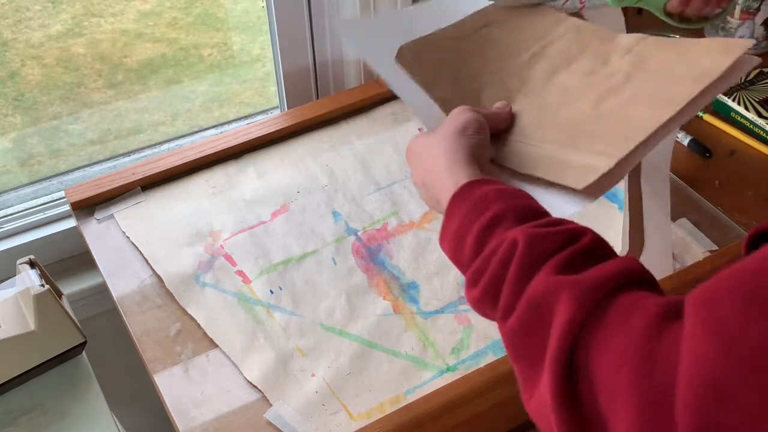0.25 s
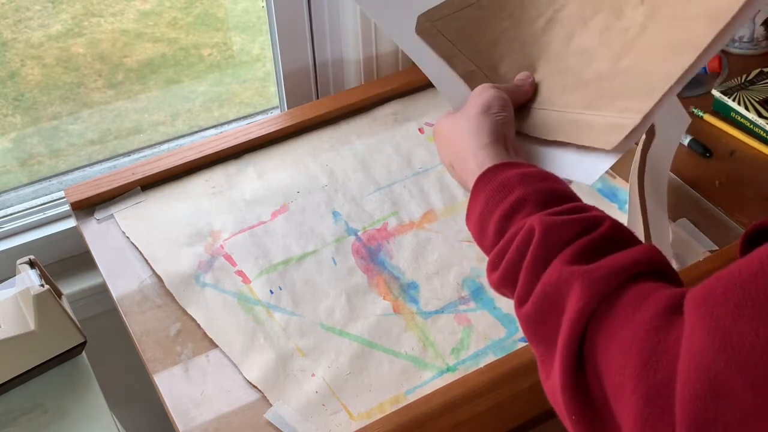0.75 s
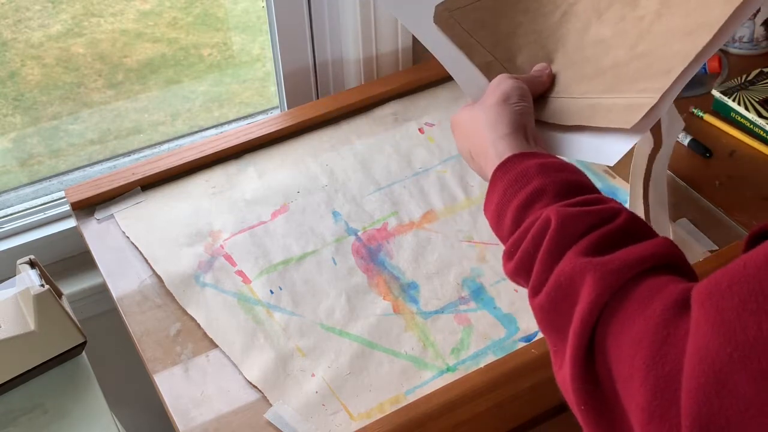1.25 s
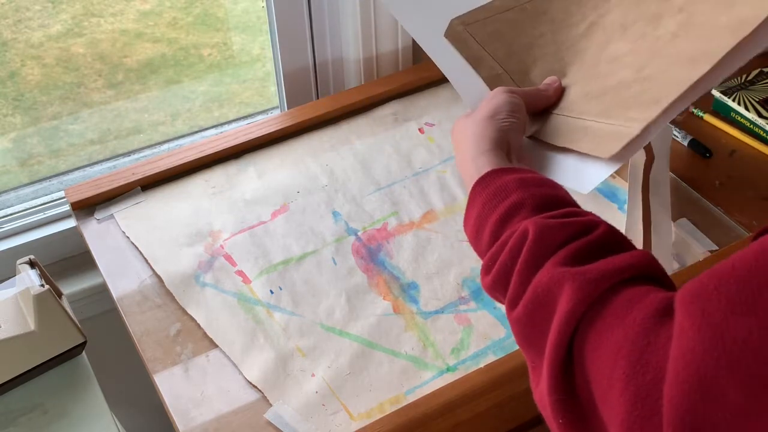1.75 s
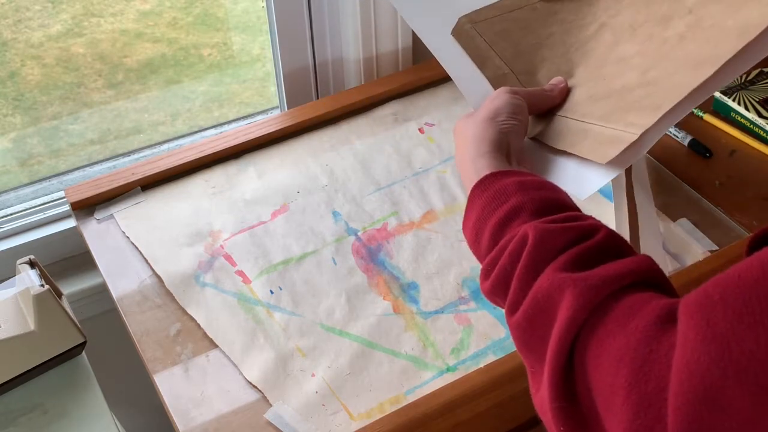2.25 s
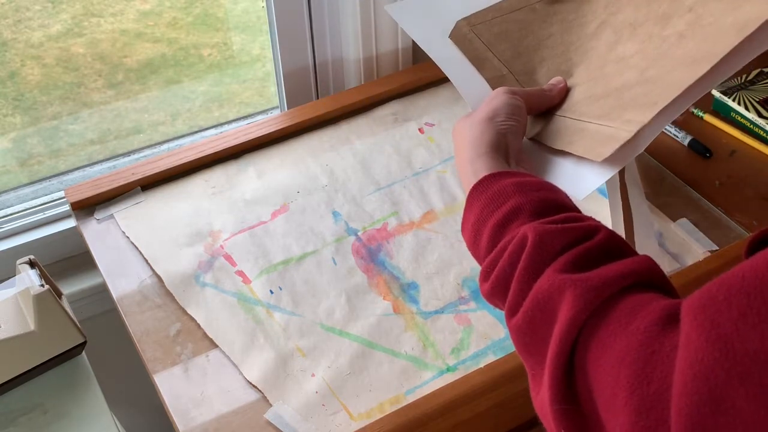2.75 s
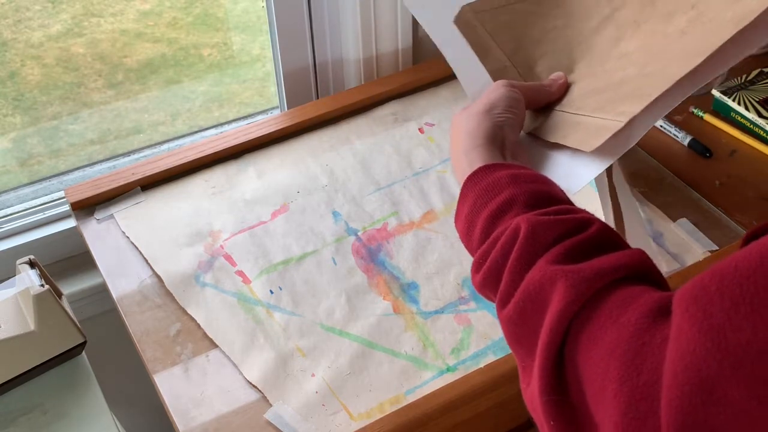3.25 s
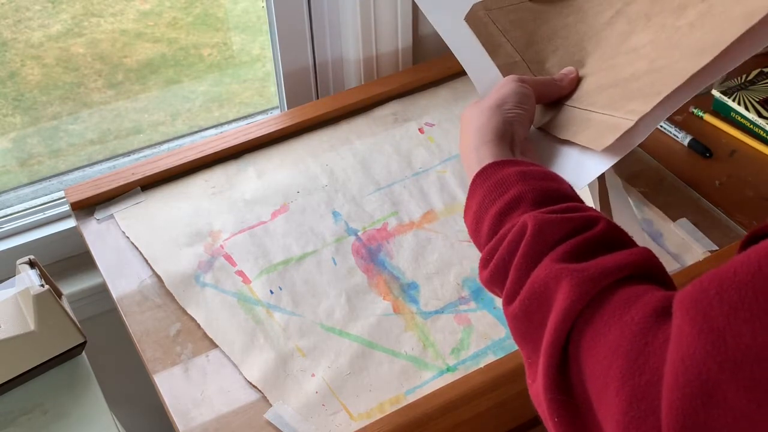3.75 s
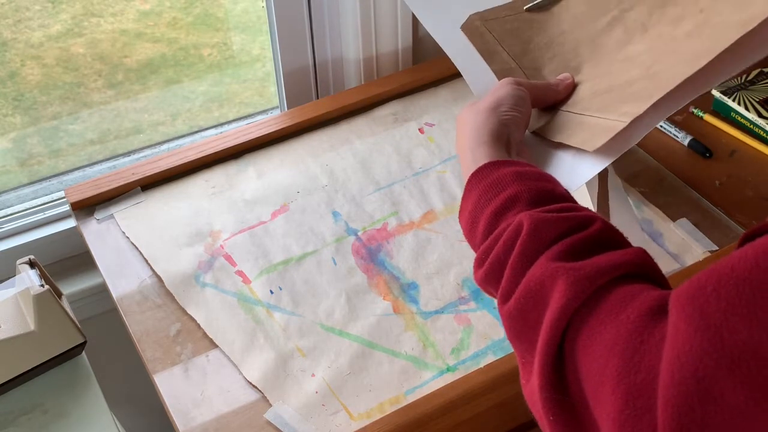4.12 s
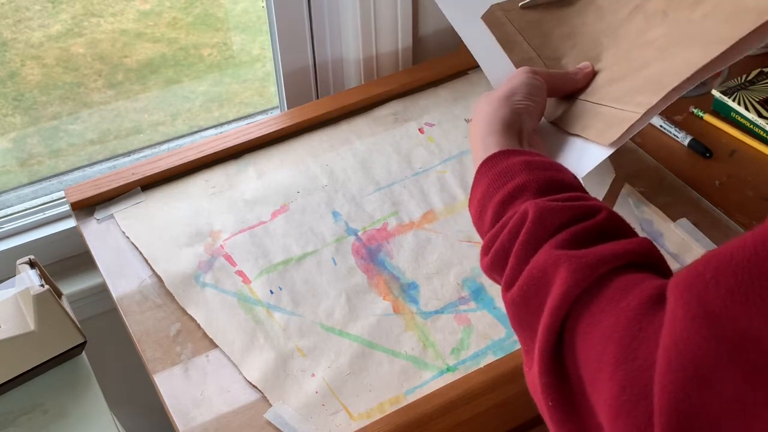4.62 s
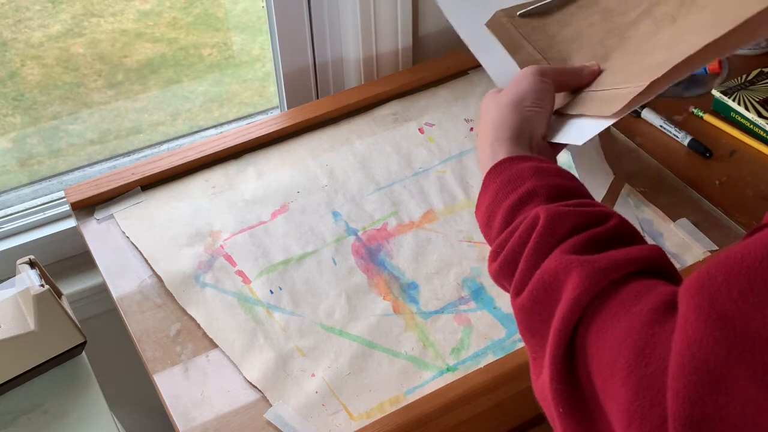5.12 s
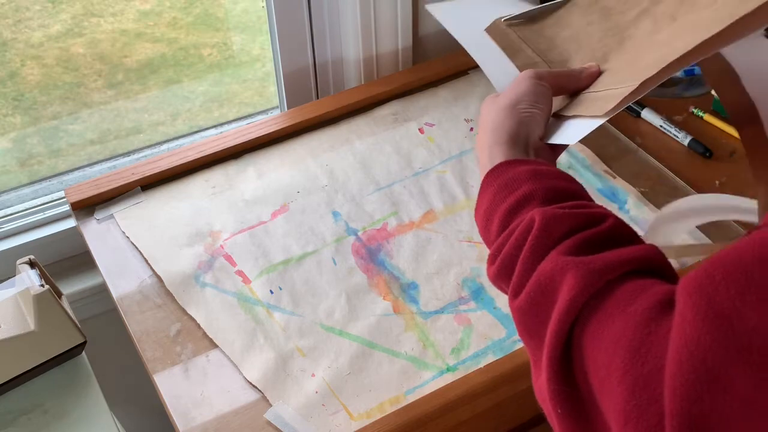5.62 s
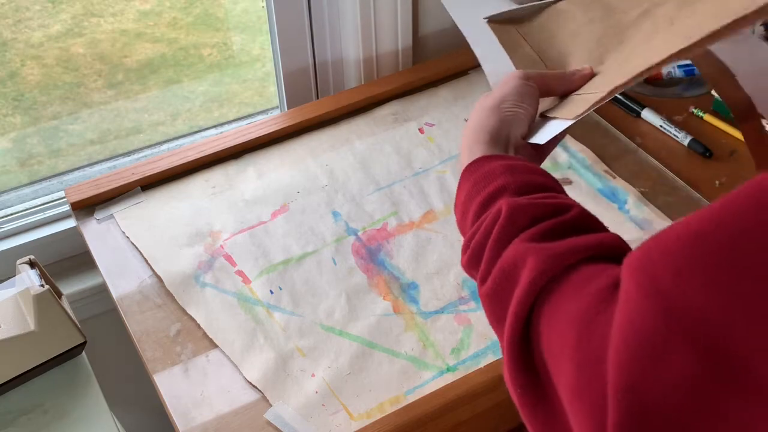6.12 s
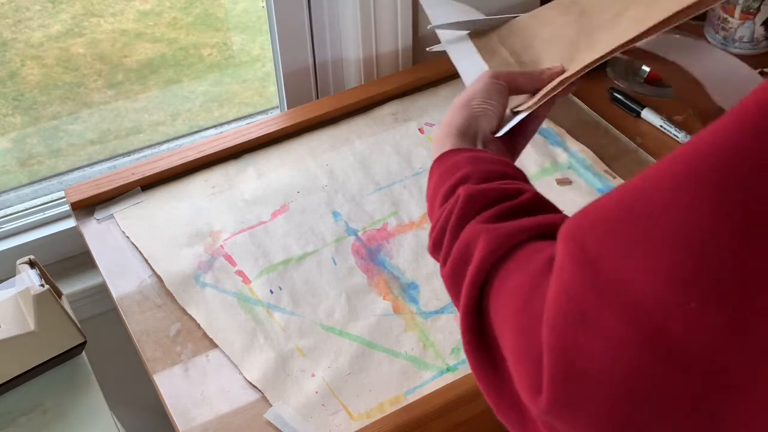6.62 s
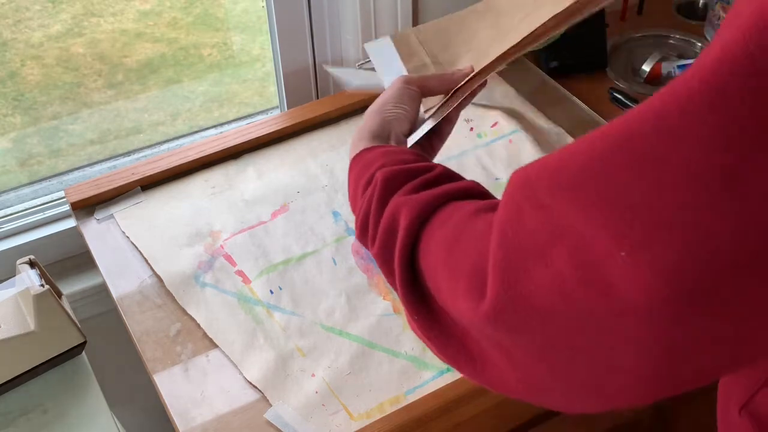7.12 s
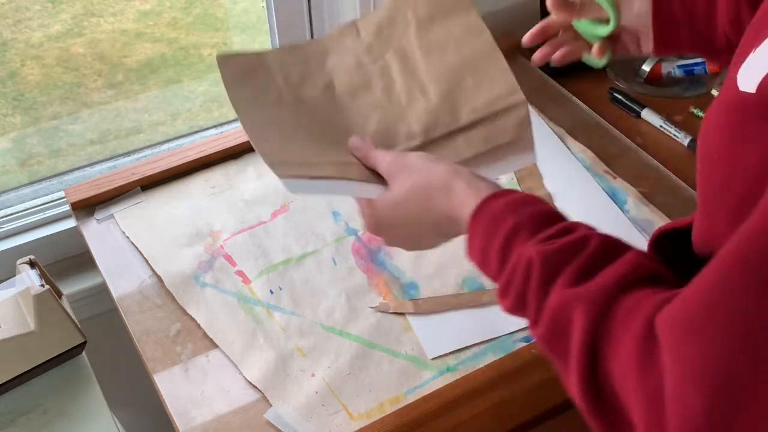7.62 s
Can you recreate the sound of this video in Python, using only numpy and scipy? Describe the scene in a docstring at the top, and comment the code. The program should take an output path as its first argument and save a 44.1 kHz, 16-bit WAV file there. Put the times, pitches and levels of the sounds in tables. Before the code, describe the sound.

In a small room, close to a wooden table, held paper slides and rustles quietly with a few faint snaps. After about two seconds scissors bite through a paper bag and sheet together, in short crunchy runs with hard snaps. Sheets rub between cuts; the later cuts rasp higher. Finally the paper slips, flaps lightly and goes almost silent over a low, faint rumble.

```python
"""Paper first slides and rustles with a few faint snaps; then scissors cut through a paper bag and a sheet
held together, over a wooden table in a small room. Each closing of the blades is a crunch of random fibre
fractures in clumps, with sharp snaps, short fracture bursts, where the stack gives way. Between cuts the
sheets rub, as dense grains under arched gains; at the end the offcut drops and the paper flaps, as
band-limited bursts. Resonances, room reflections and a low rumble surround it all."""
import sys
import numpy as np
from scipy import signal
from scipy.fft import rfft, irfft, next_fast_len
from scipy.io import wavfile
from scipy.ndimage import uniform_filter1d

SR = 44100
rng = np.random.default_rng(int(sys.argv[2]) if len(sys.argv) > 2 else 0)


def unload_wav(signal):
    """Save mono or channel-first audio to the path in sys.argv[1] as 16-bit WAV at rate SR, clipped to [-1, 1]."""
    wavfile.write(
        sys.argv[1],
        SR,
        np.round(np.clip(np.atleast_2d(signal).T, -1, 1) * 32767).astype(np.int16),
    )


N = 347067
TIME = np.arange(N) / SR


def cuts(fade_s=0.003):
    """Progressive fracture: the crossing point of the blades ploughs on, breaking fibres in clumps."""
    # blades closing through paper: start t/s, end t/s, relative early level/dB, relative late level/dB,
    # sheet boom/dB, crispness/dB
    closings = [(2.19, 2.627, -76, -59, 4.5, 1.5), (2.868, 3.053, -41, -48.5, -4, 1.5),
                (3.651, 3.731, -61, -47.5, -13, -3), (3.765, 3.88, -65, -46, -7, -9.5),
                (3.876, 3.955, -40, -49, -3, -4), (4.211, 4.269, -41, -42, 7.5, -3),
                (4.282, 4.39, -51, -45.5, -4, 13), (4.763, 4.941, -43, -39, -3, 4),
                (5.62, 5.672, -36.5, -36, -1.5, 1), (5.679, 5.886, -42, -46.5, 3, 4.5),
                (6.276, 6.344, -35.5, -34.5, -0.5, 3.5), (6.729, 6.818, -44.5, -39, -9, 9.5)]
    out = np.zeros(N)
    t = np.arange(SR // 2) / SR
    for start, end, early_db, late_db, boom_db, crisp_db in closings:
        crunch = fibres(len(t), per_s=2800, spread_db=4.0) * clumps(len(t), per_s=260, depth_db=4.5)
        gate = np.clip(t / fade_s, 0, 1) * np.clip((end - start - t) / fade_s, 0, 1)
        level = gain_of(np.interp(t, [0, end - start], [early_db, late_db]))
        add(out, start, voiced(crunch, boom_db, crisp_db) * gate * level)
    return gain_of(-4.0) * out


def snaps(count=4096, lead_size=512, build_s=0.0045):
    """Sudden release of strain: fibres start to fail under the blades, then a whole bundle parts at once."""
    # the stack gives way: t/s, relative level/dB, relative brightness/dB
    releases = [(0.084, -50.5, 4), (1.437, -42, -3), (1.803, -49, 8), (1.833, -45.5, 4.5), (2.136, -40, 1),
                (2.195, -40, -1.5), (2.22, -42, 3.5), (2.279, -39.5, 1), (2.362, -44.5, -2.5),
                (2.397, -43.5, 2.5), (2.466, -44.5, -4), (2.529, -41, 1.5), (2.611, -46.5, -4),
                (2.843, -47.5, 1), (2.8686, -27.5, 2), (2.95, -34.5, -6.5), (2.982, -40, 0),
                (3.084, -39.5, -2.5), (3.635, -32, 5.5), (3.669, -34, 0), (3.778, -41.5, -1),
                (3.837, -39, 1.5), (3.867, -27.5, 1), (3.918, -37.5, -0.5), (4.206, -42, -5.5),
                (4.278, -32.5, -7), (4.76, -30.5, 2.5), (4.803, -31.5, -2), (4.862, -34.5, -4),
                (4.887, -37, -2), (4.913, -36, -3), (5.383, -53, 21.5), (5.623, -32.5, 1),
                (5.741, -40.5, 3.5), (6.291, -32, 3.5), (6.722, -36, 1.5), (6.762, -33, 7)]
    typical_s, typical_db, halving_db = 0.0033, -36, 21  # decay time at a typical level; harder snaps are shorter
    boom_per_bright, crisp_per_bright = -0.84, 1  # a bright snap has less sheet boom, more fine fibre (dB per dB)
    out = np.zeros(N)
    for s, db, bright_db in releases:
        decay_s = typical_s * 0.5 ** ((db - typical_db) / halving_db)
        snap = np.roll(burst(decay_s, rise_s=0.0011, count=count), lead_size)
        swell = np.exp(np.arange(-lead_size, 0) / SR / build_s)
        strain = fibres(lead_size, per_s=18000, spread_db=4.5) * swell
        snap[:lead_size] += gain_of(-23.0) * strain
        snap = voiced(snap, boom_per_bright * bright_db - 0.7, crisp_per_bright * bright_db - 0.3)
        snap = snap * np.sqrt(SR / 100 / count)  # from rms over the whole window to rms over 10 ms
        add(out, s - lead_size / SR, gain_of(db) * snap)
    return gain_of(-0.5) * out


def burst(decay_s, rise_s, count):
    """Fracture cascade: a run of breaks that builds quickly and dies away exponentially."""
    t = np.arange(count) / SR
    envelope = (1 - np.exp(-t / rise_s)) * np.exp(-t / decay_s)
    return fibres(count, per_s=14000, spread_db=2.0) * envelope


def fibres(count, per_s, spread_db):
    """Random impulse train: tiny fractures at random moments, most small and a few large."""
    broken = rng.random(count) < per_s / SR
    size = np.minimum(rng.exponential(1, count), 4)
    sign = rng.choice([-1., 1.], count)
    return evened(sign * broken * gain_of(spread_db * size))


def clumps(count, per_s, depth_db):
    """Stick-slip: uneven catching and slipping modulates the sound as a wandering gain."""
    knots = rng.standard_normal(4096)
    wander = np.interp(np.arange(count) * per_s / SR, np.arange(len(knots)), knots)
    return evened(gain_of(depth_db * wander))


def voiced(x, boom_db, crisp_db, boom_hz=900, crisp_hz=5000):
    """Band weighting: the low band (the sheet as a soundboard) and the top (fine fibres) against the middle."""
    hz, z = np.fft.rfftfreq(len(x), 1 / SR), rfft(x)
    low = 1 / (1 + (hz / boom_hz) ** 6)
    below_top = 1 / (1 + (hz / crisp_hz) ** 6)
    out = 0
    for band, db in [(low, boom_db), (below_top - low, 0), (1 - below_top, crisp_db)]:
        share = np.sqrt(np.mean(band))  # wider bands carry more
        out = out + gain_of(db) * share * evened(irfft(z * band, len(x)))
    return out


def rustle():
    """Friction noise: sliding strokes swell and fade over the faint rubbing of the held sheets."""
    # the sheets are shifted, or the open blades slide on to the next bite:
    # start t/s, length/s, relative level/dB, crispness/dB
    strokes = [(0.132, 0.24, -52, -1.5), (0.347, 0.15, -50.5, -10), (0.607, 0.14, -48, -8),
               (1.046, 0.28, -57, -12), (1.377, 0.15, -50, -12), (1.961, 0.092, -66, 7),
               (3.246, 0.16, -41, -4.1), (4.498, 0.08, -51, -3.5), (5.137, 0.18, -51, 4),
               (5.321, 0.2, -45.5, -3), (6.032, .17, -47, 3), (6.453, 0.18, -52.5, 6.3),
               (6.899, 0.32, -49.5, 0), (7.139, 0.23, -56.5, -1.5)]
    # the held sheets rub faintly all along: t/s, relative level/dB
    holding = [(0, -53.5), (0.55, -63), (1.02, -78.5), (1.34, -69), (1.55, -55), (2.1, -55.5), (3.42, -67),
               (3.5, -65.5), (4.45, -55), (4.7, -81), (4.95, -52.5), (6.9, -49), (7.3, -77.5), (7.45, -77),
               (7.86, -82)]
    # colour of sliding paper: f/Hz, relative level/dB
    slide_colour = [(100, -9.5), (300, 2), (600, -6.5), (1000, -3.5), (1900, -2.5), (4000, -4),
                    (6000, -4.5), (9000, -7), (13500, -7.5), (15500, -13.5)]
    held = rubbing(next_fast_len(N), boom_db=-3, crisp_db=-10.5)[:N]  # slow rubbing is dull
    out = gain_of(np.interp(TIME, *np.transpose(holding)) - 2.0) * held
    t = np.arange(SR // 2) / SR
    for start, length, db, crisp_db in strokes:
        speed = np.sin(np.pi * np.minimum(t / length, 1)) ** 0.87  # speeds up and slows down in one arch
        add(out, start, gain_of(db - 2.3) * speed * rubbing(len(t), -3, crisp_db))
    return coloured(out, slide_colour)


def rubbing(count, boom_db, crisp_db):
    """Asperity contact: paper rubbing on paper gives a fine, dense grain."""
    grain = fibres(count, per_s=11000, spread_db=3.0) * clumps(count, per_s=140, depth_db=4.5)
    creases = fibres(count, per_s=45, spread_db=5.0)  # tick now and then
    return voiced(grain + gain_of(-10.5) * creases, boom_db, crisp_db)


def flexes(count=16384):
    """Panel buckling: paper gives way with a hollow puff, a crackle or a thin scrape, each in one band."""
    # the loose sheets buckle, scrape or land:
    # t/s, relative energy level/dB, low edge f/Hz, high edge f/Hz, decay time/s
    bucklings = [(0.895, -58, 293, 2310, 0.014), (0.98, -65, 13000, 13900, 0.087),
                 (2.873, -35.5, 483, 660, 0.038), (3.577, -50, 704, 4100, 0.006),
                 (4.22, -48, 205, 328, 0.077), (4.302, -40, 444, 673, 0.014), (4.798, -43, 232, 403, 0.052),
                 (4.864, -32, 475, 665, 0.01), (5.28, -48, 472, 690, 0.0027),
                 (6.04, -43.5, 201, 720, 0.042), (6.476, -44, 455, 810, 0.089),
                 (6.61, -35, 2260, 3900, 0.0036), (6.936, -42.5, 590, 1000, .04),
                 (7.017, -41, 1900, 3140, .012), (7.124, -42.5, 400, 3030, 0.012),
                 (7.149, -36.5, 227, 1860, 0.0041), (7.172, -48.5, 7500, 15100, 0.064),
                 (7.335, -46, 195, 1400, 0.009), (7.696, -53, 260, 985, 0.0075)]
    out = np.zeros(N)
    for s, db, low_hz, high_hz, decay_s in bucklings:
        band = signal.butter(2, [low_hz, high_hz], "bandpass", fs=SR, output="sos")
        puff = signal.sosfilt(band, burst(decay_s, decay_s / 2, count))
        puff = puff / np.linalg.norm(puff) * np.sqrt(SR / 100)  # the energy of 10 ms at rms 1
        add(out, s, gain_of(db) * puff)
    return gain_of(-2.0) * out


def bending(x, depth_db, hz_size=4, time_size=14):
    """Time-varying resonance: the sheets bend, so their broad resonances come and go."""
    z = signal.stft(x, SR, nperseg=512, noverlap=384)[2]
    patches = rng.standard_normal(z.shape)
    for size, axis in [(hz_size, 0), (time_size, 1)] * 2:  # smoothed twice, in bins and frames
        patches = uniform_filter1d(patches, size, axis)
    gain = evened(gain_of(depth_db * evened(patches)))
    return signal.istft(z * gain, SR, nperseg=512, noverlap=384)[1][:N]


def rasping(x, start_s=5.3, low_hz=2500, high_hz=4800, rasp_db=-4.5):
    """Band emphasis: near the end of the cut the strip hangs almost free, and the paper rasps higher."""
    band = signal.butter(1, [low_hz, high_hz], "bandpass", fs=SR, output="sos")
    rasp = signal.sosfilt(band, x)
    onset = np.clip((TIME - start_s) * 10, 0, 1)  # fades in over 0.1 s
    return x + onset * (gain_of(rasp_db) * rasp - 0.15 * x)


def ringing(x):
    """Modal decay: narrow resonances, set going by the paper sound, ring on briefly as damped cosines."""
    # resonances that the paper sound sets ringing: f/Hz, relative level/dB, t60/s
    modes = [(544.8, 8.5, 0.15), (657, -7.5, 0.2), (970, -13, 0.34), (1142, 4, 0.2), (1370, -7.5, 0.18),
             (1678, -12.5, 0.43), (1960, -22.5, 0.28), (2230, -3, 0.24), (2640, -11, 0.27),
             (2700, -9.5, 0.27)]
    t = np.arange(SR // 2) / SR
    response = 0
    for hz, db, t60 in modes:
        damping = np.log(1000) / t60
        mode = np.exp(-damping * t) * np.cos(2 * np.pi * hz * t)
        response = response + gain_of(db) * 2 * damping / SR * mode  # equal peak gain before the level
    return signal.oaconvolve(x, response)[:N]


def moving_room(x, near_db, tail_db, count=7):
    """Varying impulse response: the paper keeps moving, so the reflections change from place to place."""
    place = (TIME * 6) % count  # six places a second, in a circle
    out = 0
    for k in range(count):
        offset = (place - k + count / 2) % count - count / 2
        crossfade = np.cos(np.pi / 2 * np.clip(offset, -1, 1))
        out = out + room(x * crossfade, near_db, tail_db)
    return out


def room(x, near_db, tail_db, near_decay_s=0.0031):
    """Reverberation: quick reflections from table, sheets and window, then the tail of the room."""
    # reverberation time: f/Hz, t60/s
    room_decay = [(250, 0.45), (1000, 0.27), (4600, 0.31), (12000, 0.16)]
    t = np.arange(SR // 2) / SR
    sign = rng.choice([-1., 1.], (2, len(t)))
    near, far = sign * (rng.random((2, len(t))) < 1 / 8)  # sparse echoes
    near = near * (t > 0.001) * np.exp(-t / near_decay_s)
    hz, age, z = signal.stft(far * np.clip(t / 0.0058, 0, 1), SR, nperseg=256)
    decay = gain_of(-60 * age / read(room_decay, hz)[:, None])
    tail = signal.istft(z * decay, SR, nperseg=256)[1][:len(t)]
    response = gain_of(near_db) * near / np.linalg.norm(near) + gain_of(tail_db) * tail / np.linalg.norm(tail)
    return signal.oaconvolve(x, response)[:N]


def rumble():
    """Filtered noise: the low background of the house, under a slowly changing level."""
    # colour of the rumble: f/Hz, relative level/dB
    rumble_colour = [(20, -19.5), (38, -11), (62, -1.5), (85, -4), (120, -6.5), (170, -15), (500, -31.5),
                     (1500, -46)]
    # course of the rumble: t/s, relative level/dB
    rumble_course = [(0, -58), (1.3, -62.5), (2.1, -64.5), (2.6, -65), (6.2, -65.5), (7.6, -67.5)]
    level = gain_of(np.interp(TIME, *np.transpose(rumble_course)))
    return level * evened(coloured(rng.standard_normal(N), rumble_colour, size=16384))


def ports(common, apart):
    """Partial coherence: two close microphones share one part of the field, the other has opposite signs."""
    # the microphone pair: f/Hz, left-right likeness (-), left phase lead/rad, left minus right gain/dB
    pair = [(60, 0.88, 0, 1.5), (200, 0.85, -0.53, .5), (540, 0.55, -.5, -1.5), (967, 0.1, 0.5, -1),
            (1980, 0.3, -0.6, -1), (2940, 0.16, -2, 0), (5160, 0, -7.5, 3), (6540, 0.3, -5.5, 1.5),
            (7920, 0.5, -5, -1), (9250, .995, -3.25, 0), (10050, .995, -3.05, 0), (11200, .77, -1.7, 0),
            (12800, .98, -.1, 0), (13600, .98, .1, 0), (15800, .65, 2.5, 4)]
    hz = np.fft.rfftfreq(2 * SR * 4, 1 / SR)
    f, *columns = np.transpose(pair)
    likeness, phase, balance_db = (np.interp(hz, f, column) for column in columns)
    likeness, count = np.clip(likeness, 0, 1), 2 * (len(hz) - 1)
    same = np.sqrt((1 + likeness) / 2) * rfft(common, count)
    opposite = np.sqrt((1 - likeness) / 2) * rfft(apart, count)
    turn = np.exp(0.5j * phase) * gain_of(balance_db / 2)  # half on each side
    return irfft(np.array([(same + opposite) * turn, (same - opposite) / turn]), count)[:, :N]


def coloured(x, colour, size=4096):
    """Minimum-phase filtering: a causal filter with the given spectrum; white noise keeps its level."""
    gain = evened(gain_of(read(colour, abs(np.fft.fftfreq(size, 1 / SR)))))
    response = np.fft.ifft(np.exp(np.conj(signal.hilbert(np.log(gain))))).real
    return signal.oaconvolve(x, response[:size // 2])[:len(x)]


def read(points, hz):
    """Logarithmic frequency scale: joins (f/Hz, value) points by straight lines on it."""
    f, value = np.transpose(points)
    return np.interp(np.log(hz + 1), np.log(f + 1), value)


def gain_of(db):
    """Level law: decibels to amplitude."""
    return 10 ** (np.asarray(db) / 20)


def evened(x):
    """Power normalisation: scales to rms 1."""
    return x / np.sqrt(np.mean(x ** 2) + 1e-20)


def add(mix, s, sound):
    """Superposition: mixes a sound in at time s."""
    part = mix[max(round(s * SR), 0):][:len(sound)]
    part += sound[:len(part)]


def scene():
    """Superposition of cutting, rustling and flexing paper, its resonances, the room and the rumble."""
    # colour of breaking fibres: f/Hz, relative level/dB
    crack_colour = [(100, -38.5), (250, -11), (380, -12.5), (530, -4), (800, -7), (1200, -3.5), (1750, -1),
                    (2300, -7), (2900, -5.5), (5000, -12), (8000, -13.5), (12500, -15.5), (15000, -19.5)]
    cutting = coloured(snaps() + bending(cuts(), depth_db=2.0), crack_colour)
    paper = rasping(cutting + bending(rustle(), depth_db=2.0)) + flexes()
    paper = paper + gain_of(-3.5) * ringing(paper)
    common = gain_of(-2.0) * paper + moving_room(paper, near_db=-6.5, tail_db=-5.0)
    apart = moving_room(paper, near_db=-4.0, tail_db=-4.5)
    return ports(common + rumble(), apart + rumble())


def record(dry, edge_hz=15800):
    """Band limitation: a linear-phase low-pass removes the highest treble."""
    low_pass = signal.firwin(255, edge_hz, window=("kaiser", 8), fs=SR)
    return signal.oaconvolve(dry, low_pass[None], "same")


dry = scene()
out = record(dry)
unload_wav(out)
```